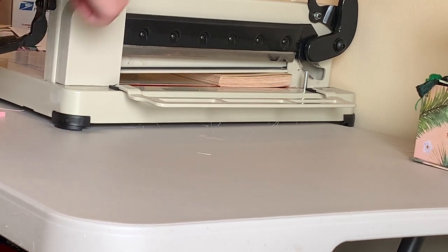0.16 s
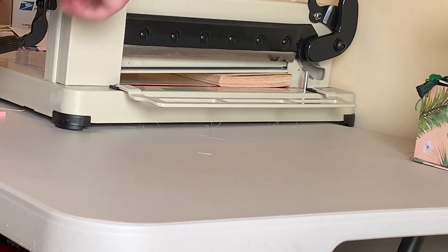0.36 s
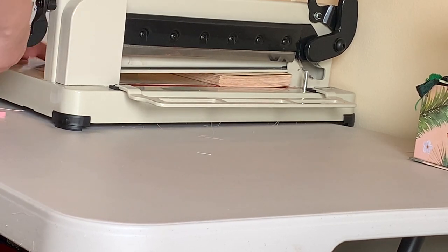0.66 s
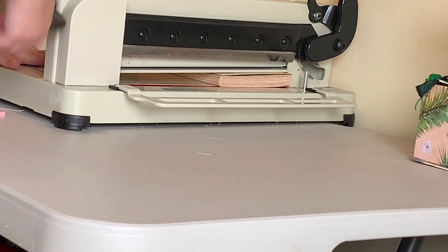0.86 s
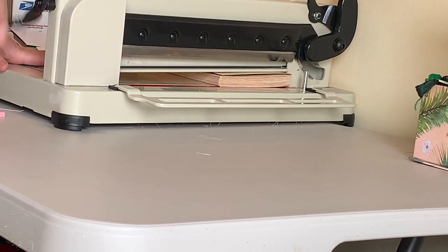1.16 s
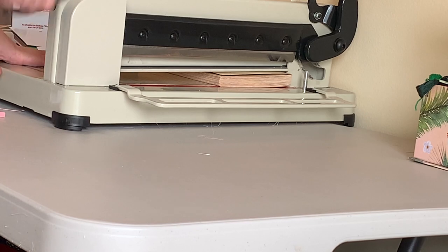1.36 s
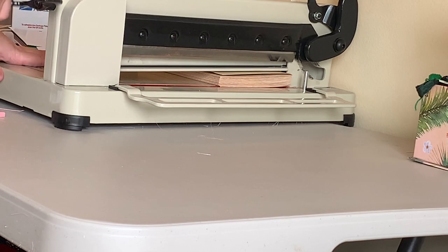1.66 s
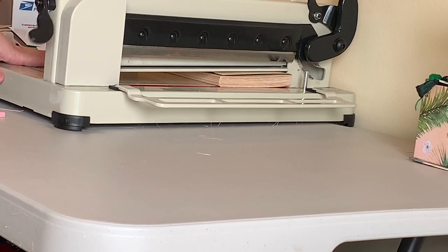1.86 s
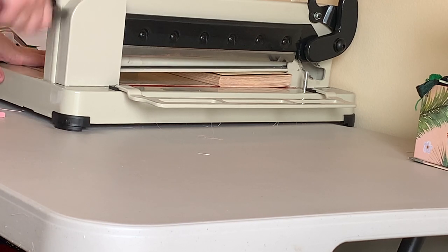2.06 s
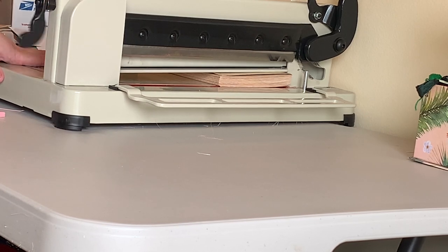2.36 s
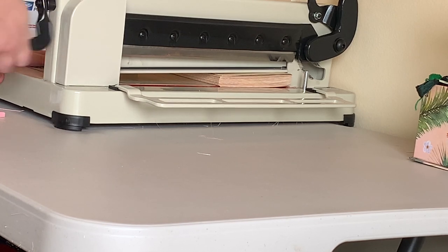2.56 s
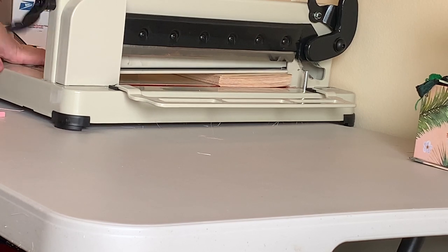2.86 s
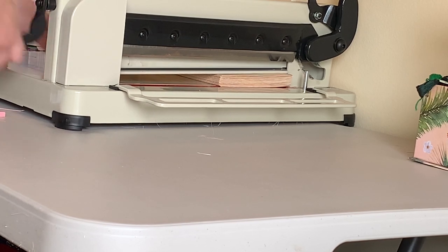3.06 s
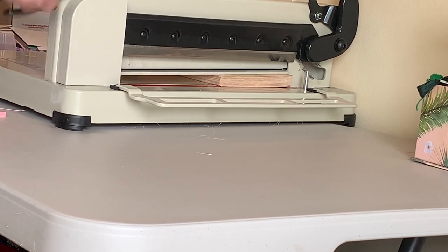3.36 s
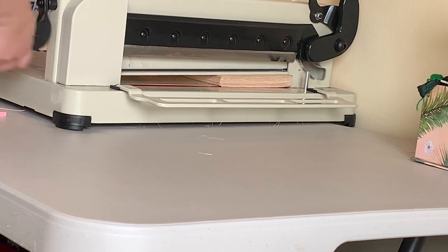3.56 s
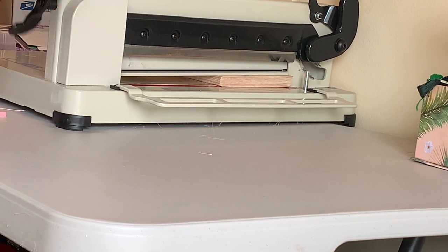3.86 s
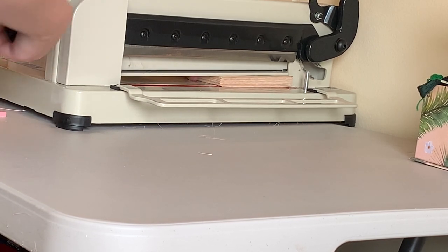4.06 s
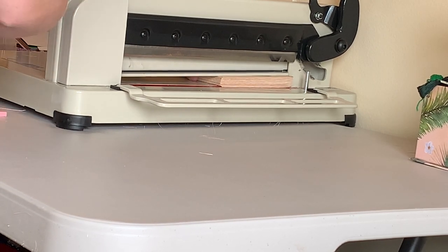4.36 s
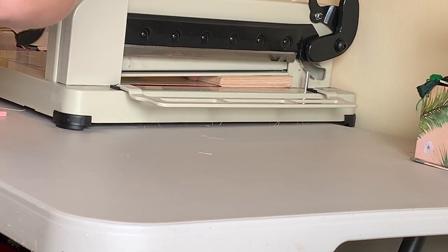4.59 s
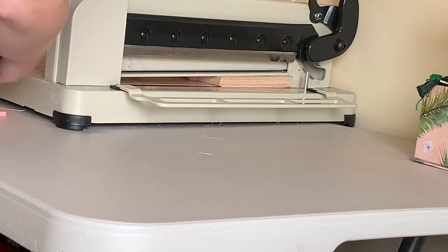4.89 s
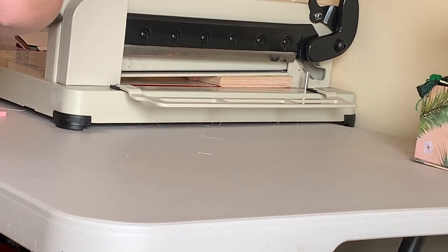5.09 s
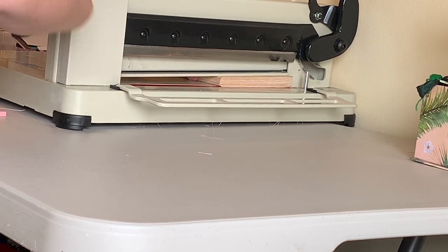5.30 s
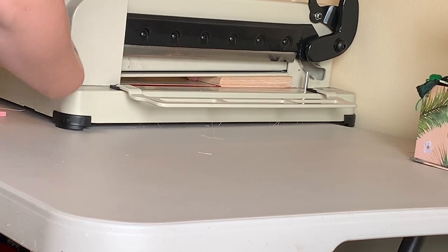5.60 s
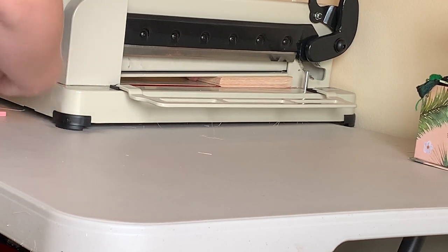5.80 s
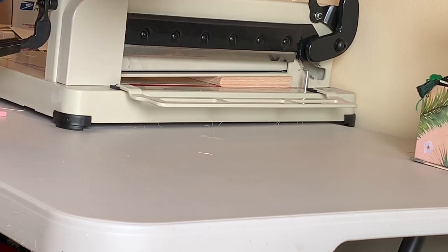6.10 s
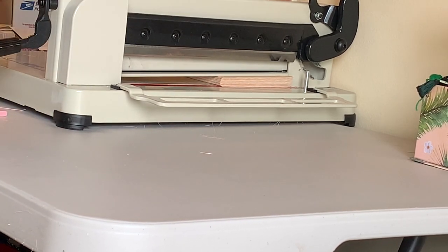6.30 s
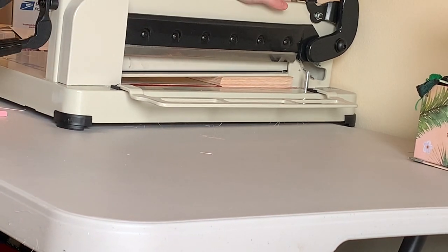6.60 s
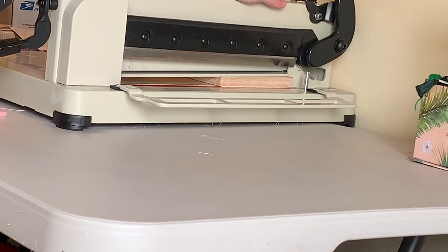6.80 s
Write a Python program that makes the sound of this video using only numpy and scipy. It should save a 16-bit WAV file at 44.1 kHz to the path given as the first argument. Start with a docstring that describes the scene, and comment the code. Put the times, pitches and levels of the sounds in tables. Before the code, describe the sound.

Irregular metal knocks and clacks from a hand crank on a paper cutter, with hollow table thuds and faint sliding paper.

```python
"""A hand works the clamp crank of a paper cutter holding a stack of pages, on a hollow table in a small room.
The screw rubs first. From 0.7 s its slack knocks on the steel frame, shaking table, cover and a loose part.
Between knocks the hand's load stirs the table's low modes, and skin and paper slide.
The hardest knocks come at 3.7 s and 4.5 s; at 6.4 s one steel part clinks.
Two microphones a few centimetres apart hear it from the side."""
import sys
import numpy as np
from scipy import signal
from scipy.fft import rfft, irfft, next_fast_len
from scipy.io import wavfile
from scipy.ndimage import uniform_filter1d

SR = 44100
rng = np.random.default_rng(int(sys.argv[2]) if len(sys.argv) > 2 else 0)


def int16_out(signal):
    """Quantize to a 16-bit WAV file."""
    q = np.round(np.clip(np.atleast_2d(signal).T, -1, 1) * 32767)
    wavfile.write(sys.argv[1], SR, q.astype(np.int16))


N = 306183

# slack hitting the frame: time_s, frame_db, frame_hz, loose_db, loose_hz, thud_rel_db, panel_rel_db
SLACK_KNOCKS = [(0.701, -57.5, 1266, -55, 2050, -10, -9), (0.734, -58, 1120, -77, 1990, -10, -14),
                (0.901, -64.5, 990, -54.5, 2370, -16, -9), (1.07, -62, 1100, -59, 2390, -6, -12),
                (1.172, -45, 890, -53, 1730, -3, -9.5), (1.182, -38.5, 548, -52.5, 1840, -17.5, 3),
                (1.204, -57, 800, -57.5, 2220, -12, -11), (1.265, -50.5, 610, -59, 1910, -2.5, -11),
                (1.44, -61, 458, -87.5, 2230, -6.5, -10), (1.608, -59.5, 930, -71.5, 1980, -3, -19),
                (1.805, -58, 715, -74.5, 2080, -1, -13), (1.936, -51, 690, -63.5, 2300, -5, -22),
                (1.954, -55, 710, -63, 2280, -6, -12), (2.148, -47.5, 790, -60, 1650, -2, -10.5),
                (2.186, -44.5, 880, -56, 2210, 1.5, -2.5), (2.199, -38, 484, -65, 1700, -11, -7),
                (2.236, -56, 523, -78, 2030, -6, -13), (2.303, -51, 980, -72, 2090, -5.5, -8),
                (2.539, -56.5, 430, -94, 2100, 2.5, -3), (2.648, -55.5, 1110, -63.5, 2140, 0, -6),
                (2.677, -44, 870, -51.5, 2140, -4, -0.5), (2.69, -45, 480, -74, 2100, 1, -10),
                (3.033, -54, 1220, -67, 2080, -6, -31), (3.116, -59, 900, -64.5, 2390, -6, -1.5),
                (3.216, -51.5, 950, -68, 1520, -4, -15), (3.6, -44, 1150, -49, 2000, -12, -25.5),
                (3.612, -46, 750, -56, 1500, -8, -20), (3.718, -36.5, 1090, -36, 2000, -9, -2),
                (3.725, -33, 855, -48, 1820, -9, -5), (3.737, -30.5, 614, -40, 2130, -7.5, -9),
                (3.903, -58.5, 600, -53.5, 2260, -19, -7), (4.178, -47.5, 980, -53.5, 2110, -3.5, -6.5),
                (4.414, -64.5, 1100, -68, 3340, -12, -14.5), (4.427, -55.5, 1000, -60, 2400, -7.5, -14.5),
                (4.458, -34, 1250, -36, 1640, -5, -18.5), (4.468, -34.5, 1150, -40, 2230, -2.5, -6),
                (4.478, -34, 450, -48.5, 2300, -4, -8), (4.664, -54, 1140, -59.5, 2170, -9.5, -16.5),
                (4.881, -62.5, 965, -77, 1760, -1, -15), (5.045, -57.5, 965, -75, 1650, -0.5, -15),
                (5.056, -50, 480, -80, 1660, -5.5, -15), (5.254, -67, 1330, -70, 1580, -3, -12),
                (5.347, -57, 1010, -78, 1713, 0, -2), (5.357, -54, 563, -83.5, 1720, 2, -11),
                (5.702, -55, 600, -74, 2340, -1.5, -7.5), (5.828, -62.5, 1150, -75.5, 2340, -17, -18),
                (5.921, -51, 1090, -59, 1720, -4, -1.5), (5.937, -48.5, 600, -62.5, 2280, -3, -15),
                (5.949, -49.5, 700, -72, 2130, -0.5, -18), (6.297, -57.5, 1190, -60.5, 2780, 0.5, -0.5),
                (6.387, -64, 1377, -58.5, 3580, -13, -13), (6.411, -73, 1110, -55.5, 2120, -7, -12.5),
                (6.42, -37, 1140, -45, 2090, -11.5, -23), (6.529, -52, 450, -67, 2100, 3, -13),
                (6.552, -62, 447, -71, 2100, 7.5, -27)]
# steel frame: pitch_hz, level_db, t60_s
FRAME_MODES = [(454.7, -0.5, 0.043), (514, 1, 0.042), (570, 5, 0.019), (661.3, -1.5, 0.038),
               (739.5, 0.5, 0.027), (871.4, -3.5, 0.029), (995, -5, 0.047), (1115, 1, 0.027),
               (1208, -4.5, 0.023), (1312, -3.5, 0.025), (1520, -8.5, 0.015)]
# hollow table: pitch_hz, level_db, t60_s
TABLE_MODES = [(65.3, -2, 0.067), (123.7, -5.5, 0.2), (137.9, -2.5, 0.2), (185.4, 6, 0.091),
               (250, -4.5, 0.18), (277.4, 1.5, 0.083), (318.5, 5.5, 0.1), (387.5, 5.5, 0.083)]
# loose part: pitch_ratio, level_db, t60_s
LOOSE_MODES = [(0.781, -3, 0.0078), (.92, -0.5, 0.0088), (1.03, 3, 0.008), (1.25, -3, 0.0079),
               (1.5, -4.5, 0.0062), (1.85, -8.5, 0.0054)]
# sheet-metal cover: pitch_hz, level_db, t60_s
PANEL_MODES = [(496.5, 2, 0.24), (662, -10.5, 0.045)]
# bare metal touching: time_s, tick_db, edge_db
METAL_CONTACTS = [(0.7, -55, -73), (0.733, -66, -97), (1.069, -72.5, -63), (1.182, -72, -77),
                  (1.267, -74, -75), (1.608, -97, -95), (1.956, -67.5, -66), (2.678, -64, -80),
                  (3.115, -88, -91), (3.719, -42, -45), (3.736, -47.5, -55.5), (3.904, -81, -89),
                  (4.179, -82, -99), (4.413, -78.5, -77.5), (4.43, -78, -79.5), (4.458, -34.5, -37),
                  (4.475, -50.5, -52.5), (5.926, -73, -64), (6.39, -70, -90.5), (6.421, -39, -55.5),
                  (6.529, -63, -88)]
# bright tick of a contact: freq_hz, level_db
TICK_SPECTRUM = [(1500, -35), (3000, 3.5), (4500, 4), (6500, 1), (8000, 2), (10000, -56)]
# sharpest part of a contact: freq_hz, level_db
EDGE_SPECTRUM = [(6500, -51.5), (9000, 9.5), (11500, 12.5), (13000, 6.5), (16000, -9)]
# single notes left ringing by blows: start_s, level_db, pitch_hz, t60_s
PING_NOTES = [(.901, -66, 2330, .08), (1.07, -67, 9800, .05), (1.18, -42.5, 747, .06),
              (1.608, -64, 2480, .04), (1.612, -60, 1100, .07), (1.955, -50, 2240, 0.065),
              (1.957, -60, 3140, 0.17), (1.959, -58, 4360, .12), (3.034, -58, 1134, .1),
              (3.04, -66, 2040, 0.094), (3.115, -57, 2444, 0.099), (3.73, -39.5, 190, 0.14),
              (3.903, -52.5, 2250, 0.14), (3.905, -58, 3270, .1), (4.179, -56, 2260, .06),
              (4.459, -35, 1660, .03), (4.46, -28.5, 2490, 0.027), (4.462, -29, 1190, 0.042),
              (4.468, -40, 275, .15), (4.665, -59, 2260, 0.14), (4.882, -73, 1770, .05),
              (5.926, -58, 12030, .04)]
# clinking steel part: pitch_hz, level_db, t60_s
STEEL_MODES = [(1021, -9.5, 0.1), (1646, -6.5, .1), (2045, -3, .08), (2098, -4, .07), (2117, -6.5, .12),
               (2410, -7, 0.073), (3070, -14, .2), (4100, -1, 0.12), (5190, -10, .2), (6255, -14.5, .2),
               (7111, -15, .15), (7830, -8, .1), (10030, 1, 0.091), (11310, -7.5, .08)]

# screw rubbing in the frame: time_s, level_db
RUB_LEVELS = [(0.0, -65), (0.3, -75), (0.8, -62.5), (1.16, -64.5), (1.66, -69.5), (2.0, -64.5),
              (2.25, -59.5), (2.55, -61), (2.84, -58), (3.09, -66), (3.23, -58), (3.4, -65), (4.1, -56),
              (4.4, -65), (4.57, -57), (4.79, -65), (5.43, -72.5), (5.97, -62.5), (6.15, -72.5),
              (6.52, -53.5), (6.7, -69.5), (6.94, -70.5)]
# screw friction: freq_hz, density_db
RUB_SPECTRUM = [(150, -2.5), (280, 12), (500, 1.5), (800, -0.5), (1150, 2.5), (1500, -11.5), (2400, -17),
                (4000, -41)]
# hand leaning on the table: peak_s, sway_db, hum_db
HAND_PUSHES = [(.65, -59, -48.5), (.81, -67, -59.5), (1.18, -70, -53), (1.31, -52.5, -47.5),
               (2.07, -64, -66), (2.18, -71, -51.5), (2.36, -55, -52), (2.43, -65, -50), (2.57, -60, -54),
               (2.73, -50, -44.5), (3.04, -57, -53), (3.2, -65, -56), (3.32, -72, -53.5),
               (3.65, -54.5, -60.5), (3.77, -51, -43.5), (3.88, -57, -73), (4.18, -79, -68),
               (4.49, -50.5, -60), (4.79, -59, -64), (5.43, -58, -58.5), (5.8, -67, -57.5),
               (6.43, -74, -60), (6.57, -58.5, -47.5), (6.88, -67, -64)]
# strokes over the pages: full_s, hold_s, slide_db, whisper_db
PAGE_STROKES = [(.76, 0.2, -69, -78), (.86, 0.023, -69, -87), (1.3, 0.016, -76, -82),
                (2.22, 0.018, -74, -88), (2.81, 0.028, -64.5, -66), (3.1, 0.0068, -71, -74.5),
                (3.25, .4, -73, -80.5), (3.77, 0.44, -68, -81), (4.58, 0.03, -71, -88),
                (6.15, 0.14, -83.5, -84.5), (6.33, 0.057, -70, -87), (6.49, .1, -66, -85.5)]
# sliding paper: freq_hz, density_db
SLIDE_SPECTRUM = [(1200, -5.5), (2200, 4.5), (4500, -3), (7000, -6.5), (9000, -26)]
# whisper of skin or page edges: freq_hz, density_db
WHISPER_SPECTRUM = [(6500, -56), (9500, 2), (11500, 5), (13000, -7), (15500, -0.5), (17000, -26.5)]
# blows shoving the page edges: full_s, hold_s, level_db
PAGE_RASPS = [(.704, .03, -66), (1.958, 0.047, -58.5), (2.15, 0.018, -72), (2.68, .03, -66),
              (3.91, .05, -70), (6.3, 0.028, -66)]
# rasping page edges: freq_hz, density_db
RASP_SPECTRUM = [(1000, -20), (2000, 1.5), (3200, 3), (4600, -0.5), (5500, -15), (8000, -31)]

# room decay: freq_hz, t60_s
ROOM_DECAY = [(100, 0.47), (260, 0.21), (700, 0.29), (1840, 0.24), (4850, 0.29), (12800, 0.18)]
# colour of the reflections: freq_hz, gain_db
WALL_COLOUR = [(60, -10), (200, -3.5), (450, 0), (1000, 0), (2000, 0.5), (4000, 2), (8000, -6),
               (14000, -5.5)]
# room tone: freq_hz, density_db
AIR_SPECTRUM = [(20, -17), (45, -3), (70, -13), (130, 5.5), (300, 6), (450, -25.5), (700, -17), (1200, -27),
                (1700, -37.5), (5000, -32), (11000, -42.5), (16000, -41)]
# diffuse field at the two microphones: freq_hz, coherence
MIC_COHERENCE = [(60, 0.89), (130, 0.99), (250, 0.6), (400, 0.071), (15000, 0.025)]
# direct sound at the left microphone: freq_hz, lag_samples
LEFT_DELAY = [(250, -4), (500, -18), (800, 0), (3500, 0), (5500, 8), (9000, 8), (10000, 7.5), (11300, 8)]
# microphone balance: freq_hz, left_over_right_db
MIC_BALANCE = [(60, -1.5), (380, -2.5), (700, 1.5), (15000, -1.5)]

LEAD_S, BLOW_S = .01, .0125  # rattle start ahead of its event; main blow after that start
SCUFF_S, RATTLE_S, GRIT_S = .0034, .005, .0097
CLINK_S, CLINK_DB, CLINK_SEND_DB = 6.421, -30.5, -5.5
TWIN_RATIO, TWIN_DB = 1.006, -6
LOAD_DB, LOAD_AT_RUB_DB, LOAD_DB_PER_DB = -67, -64, .5
ROOM_TRACKS, ROOM_DB, AIR_DB = 12, 1.5, -65
HIGHPASS_HZ, LOWPASS_HZ = 38.3, 16600


def knock(frame_db, frame_hz, loose_db, loose_hz, thud_rel_db, panel_rel_db):
    """A rattling blow shakes four bodies. Returns frame + table + loose part, and the cover panel."""
    blows = rattle(RATTLE_S, scatter=.25)
    # the place struck favours modes near frame_hz
    frame_modes = [(hz, db - 6.5 * abs(np.log2(hz / frame_hz)), t60) for hz, db, t60 in FRAME_MODES]
    loose_modes = [(ratio * loose_hz, db, t60) for ratio, db, t60 in LOOSE_MODES]
    frame = strike(blows, ring(frame_modes, spread_db=1.5, detune=.03), frame_db)
    thud = strike(blows, ring(TABLE_MODES[3:], spread_db=1.5, detune=.02), frame_db + thud_rel_db)
    clack = strike(blows, ring(loose_modes, spread_db=1.5, detune=.03), loose_db)
    panel = strike(blows, ring(PANEL_MODES, spread_db=1, detune=.003), frame_db + panel_rel_db)
    return frame + thud + clack, panel


def contact(tick_db, edge_db):
    """Grit between hard faces: a bright tick and its sharpest edge."""
    grit = rattle(GRIT_S, scatter=.28)
    return strike(grit, click(TICK_SPECTRUM), tick_db) + strike(grit, click(EDGE_SPECTRUM), edge_db)


def clink():
    """A struck steel part; each mode beats with a near twin."""
    twins = [(TWIN_RATIO * hz, db + TWIN_DB, t60) for hz, db, t60 in STEEL_MODES]
    return strike(rattle(decay_s=.003, scatter=.05), ring(STEEL_MODES + twins), CLINK_DB)


def ping(level_db, pitch_hz, t60_s):
    """One note of frame, table or a small part rings clear, with a weaker mode just above."""
    return peaked(ring([(pitch_hz, 0, t60_s), (1.012 * pitch_hz, -8, t60_s)]), level_db)


def crank():
    """Impacts dealt in turn over tracks that each get their own reflections; the ringing gets none."""
    tracks, ringing = np.zeros((ROOM_TRACKS, N)), np.zeros(N)
    for k, (time_s, *blow) in enumerate(SLACK_KNOCKS):
        dull, panel = knock(*blow)
        add(tracks[k % ROOM_TRACKS], time_s - LEAD_S, dull)
        add(ringing, time_s - LEAD_S, panel)
    for k, (time_s, *touch) in enumerate(METAL_CONTACTS):
        add(tracks[k % ROOM_TRACKS], time_s - LEAD_S, contact(*touch))
    for start_s, *note in PING_NOTES:
        add(ringing, start_s, ping(*note))
    steel, send = clink(), gain_of(CLINK_SEND_DB)
    add(tracks[0], CLINK_S - LEAD_S, send * steel)
    add(ringing, CLINK_S - LEAD_S, (1 - send) * steel)
    return tracks, ringing


def rattle(decay_s, scatter):
    """Small contacts swell into one blow, then die away; whitened to favour no pitch."""
    t = np.arange(4096) / SR - BLOW_S
    contacts = (rng.random(4096) < .2) * rng.standard_normal(4096)
    blows = scatter * contacts * np.exp(np.minimum(t / SCUFF_S, -t / decay_s))
    blows[round(BLOW_S * SR)] = 1
    spectrum = rfft(blows)
    white = irfft(spectrum / np.sqrt(uniform_filter1d(abs(spectrum) ** 2, size=12)))
    fade_in = np.exp(2 * np.minimum(t / SCUFF_S + 1, 0))
    return white * fade_in


def ring(modes, spread_db=0, detune=0):
    """A body's response to one blow lasting about a cycle; mode levels and pitches may scatter."""
    hz, db, t60 = np.transpose(modes)[:, :, None]
    t = np.arange(8192) / SR
    level_jitter, pitch_jitter = rng.standard_normal((2, len(modes), 1))
    hz = hz * (1 + detune * pitch_jitter)
    rise = (1 - np.exp(-1.5 * hz * t)) ** 2
    decay = gain_of(db + spread_db * level_jitter - 60 * t / t60)
    return (decay * rise * np.sin(2 * np.pi * hz * t)).sum(0)


def click(spectrum):
    """A very short contact with the given spectrum."""
    pulse = irfft(gain_of(read(spectrum, np.fft.rfftfreq(512, 1 / SR))))
    return np.pad(np.roll(pulse, 24), (0, 7680))


def strike(blows, response, level_db):
    """Drives a response with a train of blows, to a set peak level."""
    return peaked(signal.fftconvolve(blows, response), level_db)


def table_rumble(rub_gain):
    """Hand load stirs the table's three lowest modes; it follows the rubbing and swells at each push."""
    load = gain_of(LOAD_DB) * (rub_gain / gain_of(LOAD_AT_RUB_DB)) ** LOAD_DB_PER_DB
    pushes = np.insert(HAND_PUSHES, 1, 0, axis=1)  # hold_s = 0
    sway, hum = np.hypot(load, swells(pushes, rise_db_s=251, fall_db_s=203.5))
    force = hiss([(30, .0043), (16000, .0035)], patchy_db=1.6, flicker_db=1.4)
    low = signal.fftconvolve(force, ring(TABLE_MODES[:1])[None], axes=1)[:, :N]
    high = signal.fftconvolve(force, ring(TABLE_MODES[1:3])[None], axes=1)[:, :N]
    return sway * unit_rms(low) + hum * unit_rms(high)


def screw_rub(rub_gain):
    """Friction noise of the screw in the frame."""
    return rub_gain * hiss(RUB_SPECTRUM, patchy_db=2.9, flicker_db=.79)


def pages():
    """Paper slides, shoved edges rasp, skin whispers; slide and whisper keep a faint floor."""
    slide_gain, _ = swells(PAGE_STROKES, rise_db_s=92, fall_db_s=186.5)
    _, whisper_gain = swells(PAGE_STROKES, rise_db_s=171.5, fall_db_s=171.5)
    rasp_gain, = swells(PAGE_RASPS, rise_db_s=1500, fall_db_s=221)
    slide = np.hypot(gain_of(-87), slide_gain) * hiss(SLIDE_SPECTRUM, patchy_db=2.2, flicker_db=1.4)
    rasp = rasp_gain * hiss(RASP_SPECTRUM, patchy_db=3, flicker_db=1.6)
    whisper = hiss(WHISPER_SPECTRUM, patchy_db=1.5, flicker_db=.8)
    return slide + rasp + np.hypot(gain_of(-87.5), whisper_gain) * whisper


def direct(right):
    """Straight path to both microphones; the left one's lag varies with frequency."""
    size = next_fast_len(N)
    hz = np.fft.rfftfreq(size, 1 / SR)
    delay = np.exp(-2j * np.pi * hz * read(LEFT_DELAY, hz) / SR)
    left = irfft(rfft(right, size) * delay, size)[:N]
    return np.array([left, right])


def reflections(x):
    """Sparse reflections of random sign, new on each call; each band dies at its own rate."""
    taps = np.zeros((2, SR // 2))
    arrivals = np.arange(160, SR // 2 - 20, 20) + rng.integers(0, 20, (2, (SR // 2 - 161) // 20))
    np.put_along_axis(taps, arrivals, rng.choice([-1., 1.], arrivals.shape), 1)
    hz, t, bands = signal.stft(taps, SR, nperseg=512)
    bands = diffuse_pair(*bands, hz) * gain_of(-60 * t / read(ROOM_DECAY, hz)[:, None])
    bands = bands / np.linalg.norm(bands, axis=2, keepdims=True)
    tail = signal.istft(bands * gain_of(read(WALL_COLOUR, hz)[:, None]), SR, nperseg=512)[1]
    tail[:, :121] = 0  # gap before the first reflection
    return signal.oaconvolve(x[None], tail / np.linalg.norm(tail[0]), axes=1)[:, :N]


def room_tone():
    """Faint, mostly low background noise."""
    return gain_of(AIR_DB) * hiss(AIR_SPECTRUM, patchy_db=.99, flicker_db=.63)


def hiss(spectrum, patchy_db, flicker_db):
    """Diffuse noise at rms 1, with drifting patches and a flicker common to all frequencies."""
    frames, hz = N // 128 + 5, np.fft.rfftfreq(512, 1 / SR)
    left_re, left_im, other_re, other_im, patches = rng.standard_normal((frames, 257, 5)).T
    patches = unit_rms(uniform_filter1d(uniform_filter1d(patches, size=5, axis=0), size=16, axis=1))
    flicker = unit_rms(uniform_filter1d(rng.standard_normal(frames), size=4))
    bands = diffuse_pair(left_re + 1j * left_im, other_re + 1j * other_im, hz)
    bands *= gain_of(read(spectrum, hz)[:, None] + patchy_db * patches + flicker_db * flicker)
    return unit_rms(signal.istft(bands, nperseg=512, noverlap=384)[1][:, :N])


def diffuse_pair(left, other, hz):
    """Two microphone spectra in a diffuse field: alike in the bass, unrelated above."""
    coherence = read(MIC_COHERENCE, hz)[:, None]
    return np.array([left, coherence * left + np.sqrt(1 - coherence ** 2) * other])


def swells(events, rise_db_s, fall_db_s):
    """Power-summed gain curve per level column of events: full_s, hold_s, level_db, ..."""
    t = np.arange(0, N, 32) / SR
    full_s, hold_s, *levels_db = np.transpose(events)[:, :, None]
    drop_db = rise_db_s * np.maximum(full_s - t, 0) + fall_db_s * np.maximum(t - full_s - hold_s, 0)
    gains = [np.linalg.norm(gain_of(db - drop_db), axis=0) for db in levels_db]
    return [np.interp(np.arange(N) / SR, t, gain) for gain in gains]


def peaked(x, level_db):
    """Sets the rms level of the loudest 5 ms."""
    return gain_of(level_db) * x / np.sqrt(uniform_filter1d(x ** 2, size=220).max())


def unit_rms(x):
    """Scales to rms 1."""
    return x / np.sqrt(np.mean(x ** 2) + 1e-20)


def gain_of(db):
    """Decibels to amplitude."""
    return 10 ** (np.asarray(db) / 20)


def read(points, hz):
    """Interpolates a freq_hz, value table on a log-frequency axis."""
    freq_hz, value = np.transpose(points)
    return np.interp(np.log(hz + 1), np.log(freq_hz + 1), value)


def add(mix, start_s, sound):
    """Mixes a sound in at start_s."""
    part = mix[round(start_s * SR):][:len(sound)]
    part += sound[:len(part)]


def scene():
    """Crank impacts and their reflections, handling noise, room tone."""
    tracks, ringing = crank()
    wet = gain_of(ROOM_DB) * sum(reflections(track) for track in tracks)
    rub_gain = gain_of(np.interp(np.arange(N) / SR, *np.transpose(RUB_LEVELS)))
    handling = table_rumble(rub_gain) + screw_rub(rub_gain) + pages()
    return direct(tracks.sum(0) + ringing) + wet + handling + room_tone()


def record(dry):
    """Microphones: left-right balance by frequency, bass roll-off, band limit."""
    size = next_fast_len(N)
    balance_db = read(MIC_BALANCE, np.fft.rfftfreq(size, 1 / SR))
    tilted = irfft(rfft(dry, size) * gain_of([balance_db / 2, -balance_db / 2]), size)[:, :N]
    thinned = signal.sosfilt(signal.butter(3, HIGHPASS_HZ, "high", fs=SR, output="sos"), tilted)
    lowpass = signal.firwin(511, LOWPASS_HZ, window=("kaiser", 9), fs=SR)
    return signal.oaconvolve(thinned, lowpass[None], "same")


dry = scene()
out = record(dry)
int16_out(out)
```